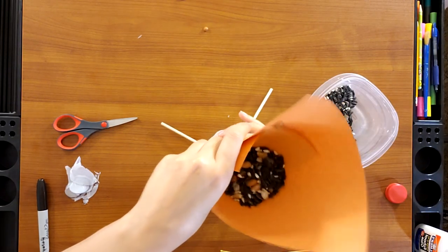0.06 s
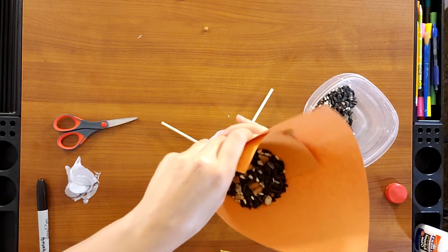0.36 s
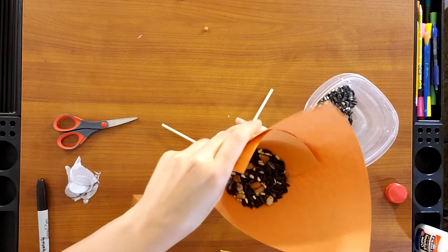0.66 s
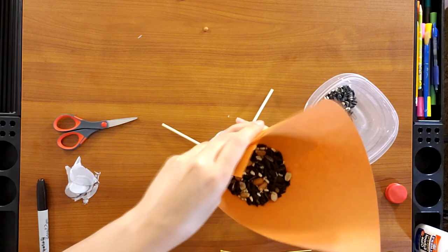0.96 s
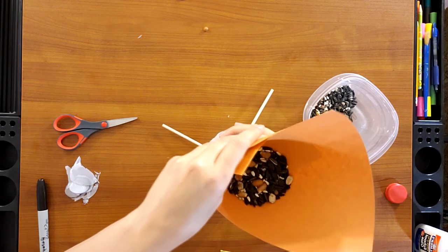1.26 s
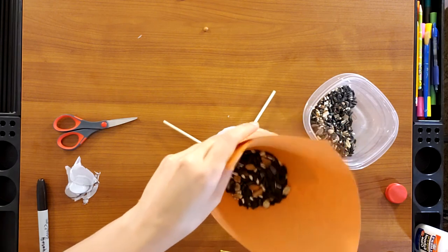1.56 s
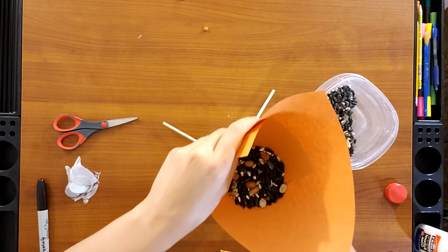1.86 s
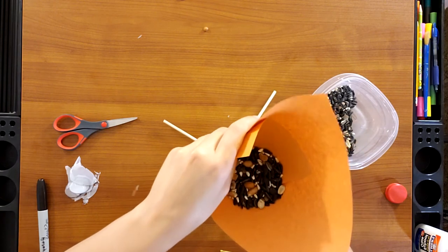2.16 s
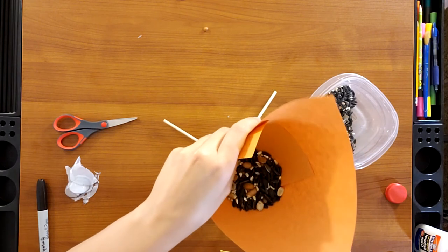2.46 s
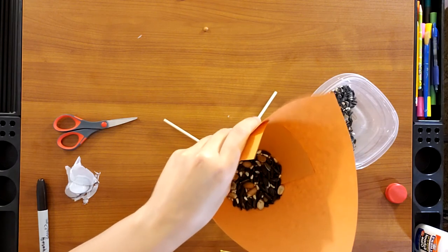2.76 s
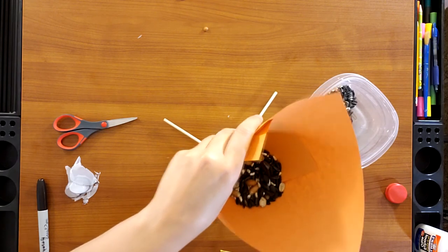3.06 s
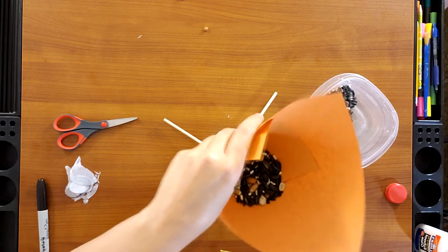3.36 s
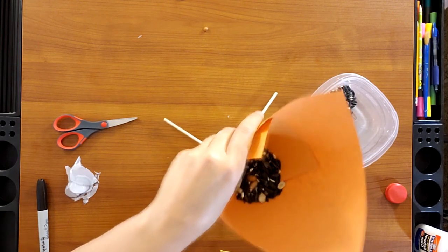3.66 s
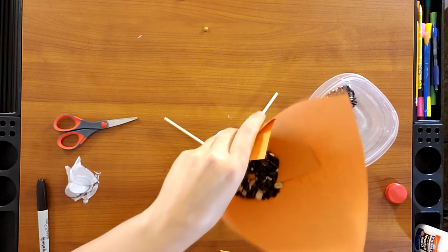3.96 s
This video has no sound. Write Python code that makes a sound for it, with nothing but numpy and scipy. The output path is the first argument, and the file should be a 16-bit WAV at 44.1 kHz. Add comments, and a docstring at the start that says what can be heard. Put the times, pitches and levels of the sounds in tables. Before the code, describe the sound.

A paper cone crackles in the hand, with bird seed shifting and rattling inside.

```python
"""A paper cone of bird seed, squeezed and turned by hand over a table in a small room.
The stiff paper buckles in single snaps; seeds shift against each other and the wall in a dense rattle.
The heap slumps now and then. Snaps, rattle and slumps ring in the hollow of the cone.
One hard seed pings and the hand knocks the cone softly, over quiet room air and mains hum."""
import sys
import numpy as np
from scipy import signal
from scipy.fft import rfft, irfft
from scipy.io import wavfile
from scipy.ndimage import uniform_filter1d

SR = 44100
rng = np.random.default_rng(int(sys.argv[2]) if len(sys.argv) > 2 else 0)


def wav_record(signal):
    """Record a signal, one row per channel, as 16-bit PCM in the file named by sys.argv[1]."""
    frames = np.transpose(np.atleast_2d(signal))
    bounded = np.clip(frames, -1, 1)
    # unit amplitude maps onto the largest positive 16-bit level
    quanta = np.round(bounded * 32767).astype(np.int16)
    wavfile.write(sys.argv[1], SR, quanta)


N = 176400

# Paper buckles, levels before trims:
# (time [s], mids [dB], bass re mids [dB], treble re mids [dB], T60 [s], facet pitch [Hz])
BUCKLES = [(0.0016, -40.5, 0, -4.5, 0.089, 1000), (0.0774, -34.5, -23, -12, 0.055, 1270),
           (0.1182, -40.5, -4, -21, 0.061, 503), (0.218, -47, -23, -2, 0.05, 2240),
           (0.258, -51.5, -2.5, -27, 0.028, 1930), (0.5092, -27, -8, -14, 0.037, 2680),
           (0.5566, -38.5, -7.5, -4.5, 0.13, 3220), (0.6234, -43, -8.5, -9.5, 0.11, 1420.0),
           (0.6505, -35, -7, -33, 0.06, 1720), (0.702, -41, -41, 5, 0.028, 5760),
           (0.822, -51.5, 5, -8, 0.062, 940), (0.91, -52, -1, -25, 0.084, 1100),
           (1.0006, -40, -18, -16, 0.044, 1770), (1.02, -42.5, -11, -2.5, 0.092, 4500),
           (1.035, -40, -5.5, -11, 0.071, 4480), (1.0812, -40, -14, -7.5, 0.037, 1700),
           (1.096, -36.5, -2, -8, 0.071, 460), (1.1518, -62, -20, 13.5, 0.029, 4530.0),
           (1.2481, -39, -38, -6.5, 0.054, 3840), (1.6077, -40, -14.5, -4, 0.053, 8800),
           (1.6551, -36, -36, -20, 0.018, 1620), (1.7051, -39.5, -19, -7, 0.049, 4360),
           (1.768, -35, -17, -20, 0.048, 4860), (1.788, -34, -31, -6, 0.048, 4080.0),
           (1.8223, -35.5, -2.5, -5, 0.073, 1350), (1.842, -34, -20, -4, 0.078, 4430),
           (1.8567, -29.5, -23, -5.5, 0.059, 2550), (1.871, -41, -12, -9, 0.053, 4400),
           (1.9254, -38, -4, -4.5, 0.13, 477), (1.9682, -35.5, -22, -5.5, 0.074, 3300),
           (2.005, -36.5, -11.5, -1.5, 0.071, 4140), (2.0812, -49, -22, 1, 0.031, 4320),
           (2.1686, -40.5, -10, -4.5, 0.061, 2760), (2.2162, -37.5, -12.5, -15, 0.057, 4160),
           (2.2779, -35.5, -10.5, -7, 0.055, 5200), (2.3426, -31, -23, -7, 0.068, 3740),
           (2.4281, -31.5, -12, -15.5, 0.068, 2250), (2.4499, -31.5, -15.5, -4.5, 0.073, 3800),
           (2.4726, -34.5, -11, -7.5, 0.056, 4200), (2.5356, -37, -10, -4.5, 0.088, 4270),
           (2.598, -33, -10.5, -5.5, 0.063, 4540), (2.6418, -35.5, -12, -6.5, 0.031, 3440),
           (2.687, -33.5, -7.5, -9.5, 0.087, 3280), (2.7177, -36, -9.5, -7, 0.067, 2040),
           (2.8274, -50.5, -7.5, -3, 0.041, 5940), (2.941, -48.5, -9, -9, 0.048, 900),
           (2.992, -34, -7.5, -30, 0.074, 500), (2.9986, -33, -1.5, -9.5, 0.059, 450),
           (3.053, -36.5, -21, -13, 0.054, 1130), (3.211, -37.5, 0, -4.5, 0.11, 1040),
           (3.3213, -42, -13, -15, 0.13, 4500), (3.3475, -40, 1.5, -5.5, 0.08, 990),
           (3.4702, -44, -23, -6, 0.033, 4430), (3.5206, -32.5, -1, -14, 0.067, 945),
           (3.5549, -38, -4, -1, 0.047, 5760), (3.5697, -37.5, -22, -4, 0.038, 4570),
           (3.6049, -41, -7.5, -3, 0.047, 3440), (3.6686, -42, -4, -1, 0.044, 1240),
           (3.7351, -30, -4.5, -17, 0.082, 3280), (3.883, -41.5, 5, -9, 0.16, 470),
           (3.9126, -39, -5, -0.5, 0.082, 3070), (3.976, -33.5, -12, -8, 0.058, 2200)]
# Seed rattle envelope: (time [s], mids [dB], treble [dB])
RATTLE_LEVELS = [(0, -46, -56), (.15, -51.5, -55), (.36, -62, -65.5), (.49, -67, -66), (.6, -47, -57),
                 (.9, -58.5, -61), (1.1, -48, -54), (1.38, -57.5, -66.5), (1.68, -49, -49.5),
                 (1.87, -35.5, -36.5), (2.13, -53.5, -56.5), (2.402, -49.5, -50.5), (2.52, -41.5, -45),
                 (2.71, -46.5, -42.5), (2.8, -52.5, -56.5), (2.97, -59, -72), (3.03, -41, -42.5),
                 (3.3, -39, -41), (3.68, -47, -50.5), (3.8, -40, -42.5), (4, -36.5, -40)]
# Wall patch resonances: (frequency [Hz])
PATCH_HZ = [2664, 3360, 4480, 5950, 6870, 8690, 10370, 11870, 13100]
# Heap slumps: (time [s], level [dB])
HEAP_SLUMPS = [(1.824, -50), (2.989, -49.5), (3.198, -44)]
# Hand knocks: (time [s], level [dB])
KNOCKS = [(0.026, -57), (2.298, -70), (3.099, -52.5), (3.398, -53.5), (3.553, -53.5), (3.707, -51.5),
          (3.864, -50.5)]
# Spectral shapes of paper, knock and room air: (frequency [Hz], relative density [dB])
PAPER_SPECTRUM = [(150, -32), (290, -11.5), (480, -3.5), (850, -3.5), (1750, 5.5), (3500, 3), (4900, -5.5),
                  (8400, -10), (10000, -17.5), (16000, -24)]
KNOCK_SPECTRUM = [(30, 4), (270, -1), (1200, -56)]
AIR_SPECTRUM = [(40, -4.5), (90, -8.5), (500, -11), (4000, -25.5), (16000, -49)]
# Modes of the hollow: (frequency [Hz], width [Hz], gain [dB])
CONE_MODES = [(274.7, 11.7, 5), (347, 10.6, 12.5), (439, 45.6, 5), (552, 16, -2), (605, 30, -1.5),
              (722.5, 25.6, 0.5), (1060, 17, -1.5), (1668, 50, -1.5), (2110, 89, -4), (2823, 68, -7),
              (3296, 28, -7.5), (3700, 12, -21), (3967, 17, -26)]
# Room tail in bass, mids, treble: (T60 [s]) and (gain [dB])
TAIL_T60_S = [0.32, 0.38, 0.42]
TAIL_DB = [-6, -7.5, -9.5]

BASS_EDGE_HZ, TREBLE_EDGE_HZ = 922, 5690
SNAP_TRIM_DB, TREBLE_TRIM_DB = -0.5, 4.5


def buckle(t60_s, lead_samples, slow_t60_s=0.075, onset_s=0.00059):
    """Paper gives way: creak, spike, crack, dying flutter. Slow buckles creak more and spike less."""
    creak_s, creak_db = 0.00091, -4.5
    crack_s, crack_db, spike_db = 0.00052, -10, 19.5
    t = np.arange(SR // 10) / SR
    slowness = (t60_s / slow_t60_s) ** 2
    sharpness = 1 / (1 + slowness)
    flutter = decay(t, t60_s) * (1 - np.exp(-t / (onset_s * slowness)))
    crack = sharpness * from_db(crack_db) * np.exp(-t / crack_s)
    burst = rng.standard_normal(len(t)) * (flutter + crack)
    burst[0] = sharpness * from_db(spike_db)
    swell = np.exp(-t[:lead_samples] / creak_s)[::-1]
    creak = (1 - sharpness) * from_db(creak_db) * swell * rng.standard_normal(lead_samples)
    return np.concatenate([creak, burst])


def paper_snaps(facet_q=7.5, facet_db=5):
    """Each buckle excites the sheet; its facet favours one pitch."""
    out, filters = np.zeros(N), band_filters()
    lead_samples = SR // 60
    attack = slice(lead_samples, lead_samples + int(0.016 * SR))
    for time_s, mids_db, bass_db, treble_db, t60_s, hz in BUCKLES:
        sheet = colour(buckle(t60_s, lead_samples), PAPER_SPECTRUM)
        snap = sheet + from_db(facet_db) * resonate(sheet, hz, hz / facet_q)
        for sos, tone_db in zip(filters, (bass_db, 0, treble_db + TREBLE_TRIM_DB)):
            band = signal.sosfilt(sos, snap)
            gain = from_db(mids_db + tone_db + SNAP_TRIM_DB) / band[attack].std()
            add(out, time_s - lead_samples / SR, gain * band)
    return out


def seed_ticks(hz, rate_per_s, spread_db=4, t60_s=0.029, rub_db=-10.5, ring_db=10):
    """Uneven impacts over a smooth rub, ringing one wall patch."""
    sizes = from_db(spread_db * np.minimum(rng.exponential(1, N), 3.1))
    hits = sizes * (rng.random(N) < rate_per_s / SR)
    power = signal.lfilter([1], [1, -decay(1 / SR, t60_s) ** 2], hits ** 2 + 1e-18)
    envelope = np.sqrt(power / power.mean() + from_db(rub_db) ** 2)
    ticks = envelope * rng.standard_normal(N)
    return ticks + from_db(ring_db) * resonate(ticks, hz, width_hz=250)


def seed_rattle(ticks_per_s=450, bass_re_mids_db=-7):
    """Seeds slide over all wall patches as the cone is tilted and squeezed."""
    ticks = sum(seed_ticks(hz, ticks_per_s / len(PATCH_HZ)) for hz in PATCH_HZ)
    running_rms = np.sqrt(uniform_filter1d(ticks ** 2, SR // 20))
    rattle = colour(ticks / running_rms, PAPER_SPECTRUM)
    times_s, *levels_db = np.transpose(RATTLE_LEVELS)
    mids_db, treble_db = (np.interp(np.arange(N) / SR, times_s, db) for db in levels_db)
    bands = zip(band_filters(), (mids_db + bass_re_mids_db, mids_db, treble_db))
    return sum(from_db(db) * unit_rms(signal.sosfilt(sos, rattle)) for sos, db in bands)


def heap_slumps(low_hz=248, high_hz=520, rise_s=0.01):
    """The heap lands against the wall: a low, papery thud."""
    out, t = np.zeros(N), np.arange(SR // 6) / SR
    sos = signal.butter(2, [low_hz, high_hz], "band", fs=SR, output="sos")
    for time_s, db in HEAP_SLUMPS:
        thud = signal.sosfilt(sos, rng.standard_normal(len(t)) * t * np.exp(-t / rise_s))
        add(out, time_s, from_db(db) * thud / thud[:SR // 20].std())
    return out


def seed_ping(time_s=2.2, db=-34.5, hz=11700, t60_s=0.016):
    """One hard seed rings briefly."""
    out, t = np.zeros(N), np.arange(SR // 20) / SR
    add(out, time_s, from_db(db) * np.sin(2 * np.pi * hz * t) * decay(t, t60_s))
    return out


def hand_knocks(flutter_db=-30, t60_s=0.16):
    """A short push on the cone, then faint flutter."""
    out, t = np.zeros(N), np.arange(SR // 4) / SR
    push = t == 0
    for time_s, db in KNOCKS:
        flutter = from_db(flutter_db) * rng.standard_normal(len(t)) * decay(t, t60_s)
        knock = colour(push + flutter, KNOCK_SPECTRUM)
        add(out, time_s, from_db(db) * knock / knock[:SR // 20].std())
    return out


def cone_hollow(x, direct_db=-2.5, drive_db=-1):
    """Cavity modes ring on top of the direct sound."""
    drive = from_db(drive_db) * x
    ring = sum(from_db(db) * resonate(drive, hz, width_hz) for hz, width_hz, db in CONE_MODES)
    return from_db(direct_db) * x + ring


def room_reverb(x, build_s=0.0096):
    """Diffuse tail, weaker but slightly longer in the treble."""
    t, tail = np.arange(SR * 2 // 3) / SR, 0
    for sos, t60_s, db in zip(band_filters(), TAIL_T60_S, TAIL_DB):
        envelope = decay(t, t60_s) * (1 - np.exp(-t / build_s))
        reflections = rng.standard_normal(len(t)) * envelope / np.linalg.norm(envelope)
        tail = tail + from_db(db) * signal.sosfilt(sos, reflections)
    return signal.fftconvolve(x, tail)[:N]


def background(air_db=-63.5, hum_hz=122, hum_db=-73.5):
    """Room air and mains hum."""
    air = unit_rms(colour(rng.standard_normal(N), AIR_SPECTRUM))
    hum = np.sqrt(2) * np.sin(2 * np.pi * hum_hz * np.arange(N) / SR)
    return from_db(air_db) * air + from_db(hum_db) * hum


def from_db(db):
    """Decibels to gain."""
    return 10 ** (np.asarray(db) / 20)


def unit_rms(x):
    """Scale to RMS 1."""
    return x / np.sqrt(np.mean(x ** 2) + 1e-20)


def decay(t, t60_s):
    """Exponential fall, 60 dB per t60_s."""
    return np.exp(-np.log(1000) * t / t60_s)


def resonate(x, hz, width_hz):
    """Two-pole resonator, unit peak gain."""
    r = np.exp(-np.pi * width_hz / SR)
    feedback = [1, -2 * r * np.cos(2 * np.pi * hz / SR), r * r]
    return (1 - r * r) / 2 * signal.lfilter([1, 0, -1], feedback, x)


def colour(x, spectrum, taps=4096):
    """Minimum-phase filter with the given spectrum."""
    hz, db = np.transpose(spectrum)
    grid_hz = np.maximum(np.arange(taps // 2 + 1) * SR / taps, 1)
    gain = from_db(np.interp(np.log(grid_hz), np.log(hz), db))
    cepstrum = irfft(np.log(gain))
    cepstrum[1:taps // 2] *= 2   # fold onto the causal half
    cepstrum[taps // 2 + 1:] = 0
    impulse_response = irfft(np.exp(rfft(cepstrum)))
    return signal.fftconvolve(x, impulse_response)[:len(x)]


def band_filters():
    """Bass, mids and treble filters."""
    edges = [(BASS_EDGE_HZ, "low"), ([BASS_EDGE_HZ, TREBLE_EDGE_HZ], "band"), (TREBLE_EDGE_HZ, "high")]
    return [signal.butter(4, hz, kind, fs=SR, output="sos") for hz, kind in edges]


def add(out, time_s, x):
    """Mix x into out at time_s, cropped to fit."""
    start = int(round(time_s * SR))
    x = x[max(-start, 0):]
    start = min(max(start, 0), N)
    out[start:start + len(x)] += x[:N - start]


def scene():
    """Cone and knocks in the room, plus dry ping and background; mono."""
    near = cone_hollow(seed_rattle() + paper_snaps() + heap_slumps()) + hand_knocks()
    return (near + room_reverb(near) + seed_ping() + background())[None]


def record(dry):
    """Steep low-pass."""
    cutoff_hz = 15800
    return signal.sosfilt(signal.ellip(10, .1, 80, cutoff_hz, fs=SR, output="sos"), dry)


dry = scene()
out = record(dry)
wav_record(out)
```